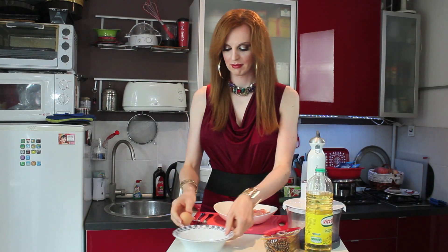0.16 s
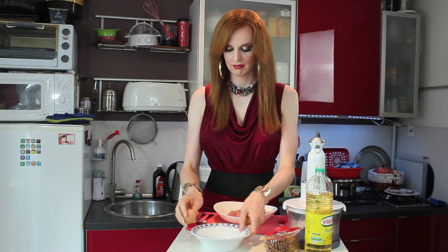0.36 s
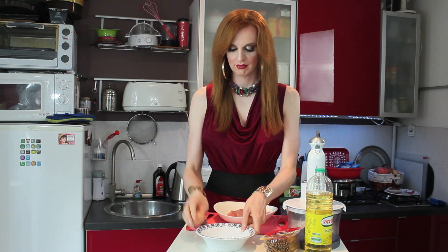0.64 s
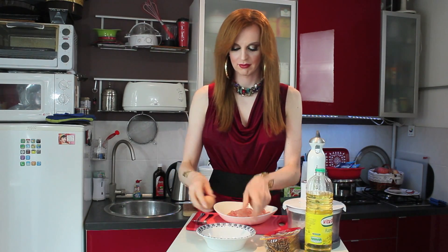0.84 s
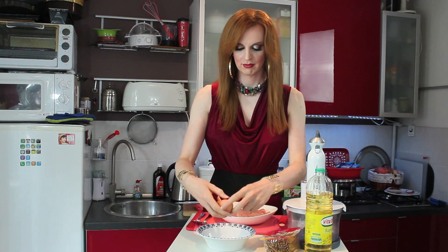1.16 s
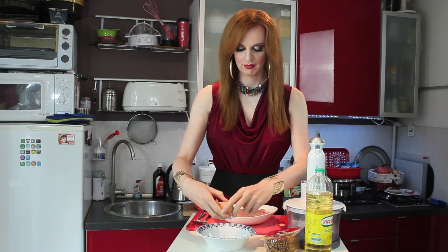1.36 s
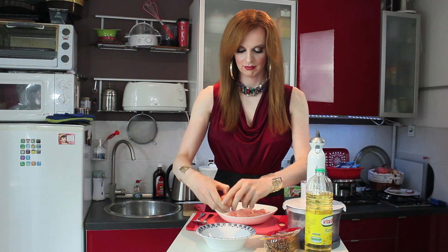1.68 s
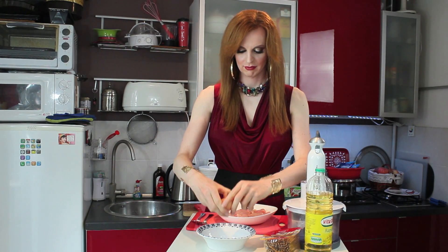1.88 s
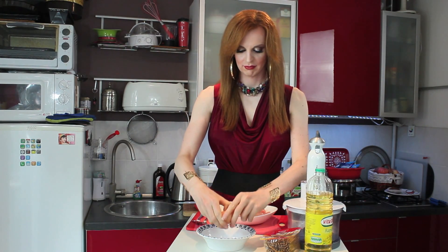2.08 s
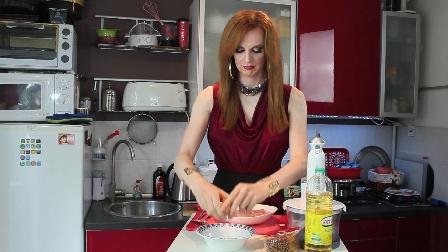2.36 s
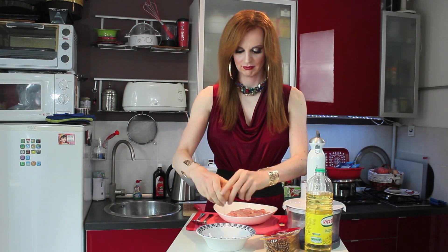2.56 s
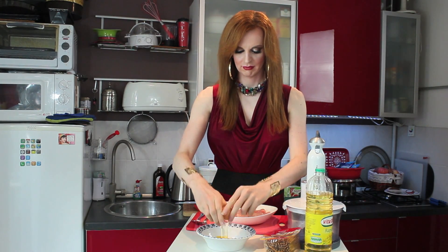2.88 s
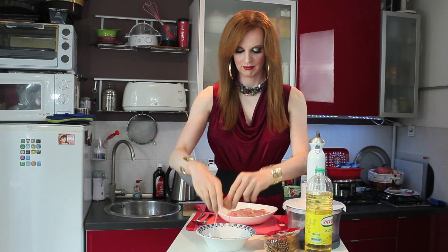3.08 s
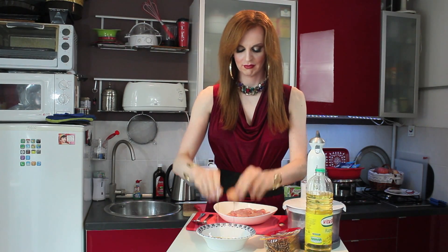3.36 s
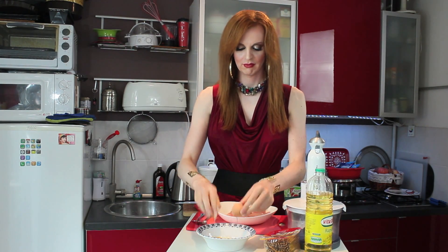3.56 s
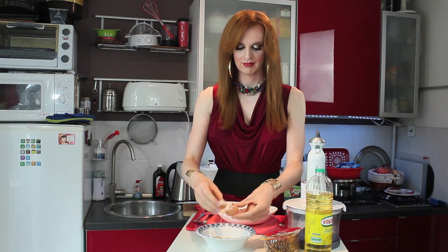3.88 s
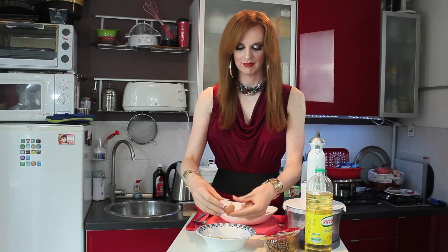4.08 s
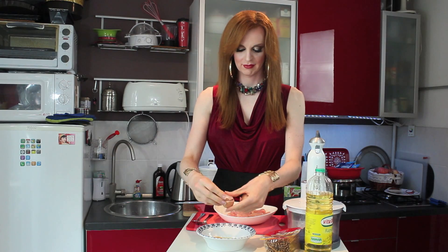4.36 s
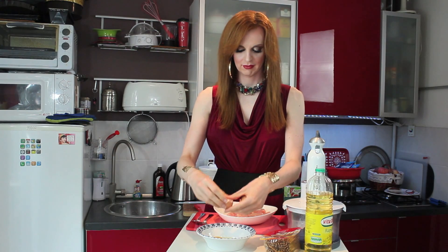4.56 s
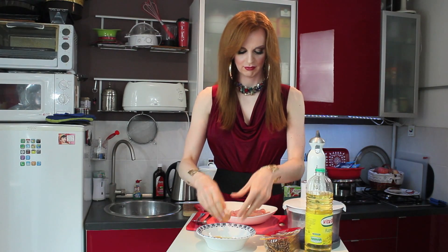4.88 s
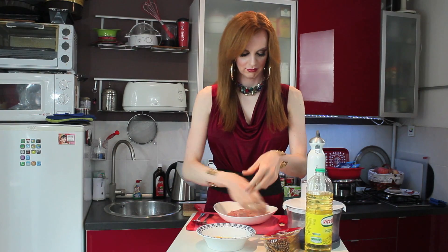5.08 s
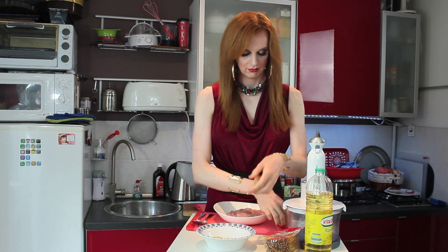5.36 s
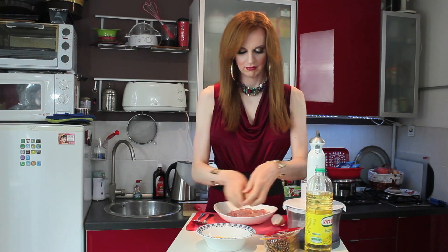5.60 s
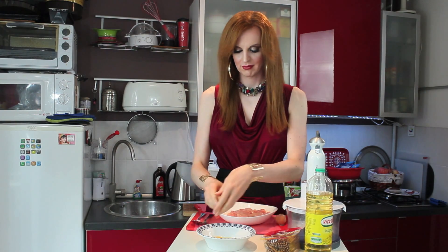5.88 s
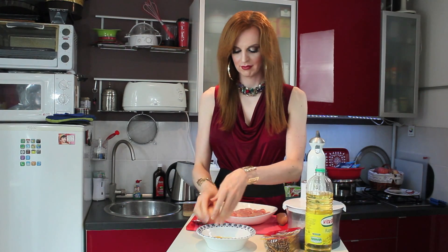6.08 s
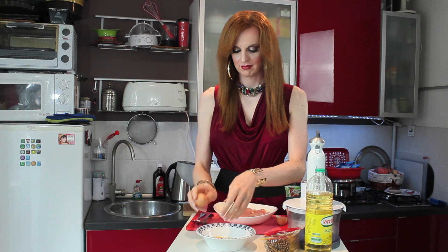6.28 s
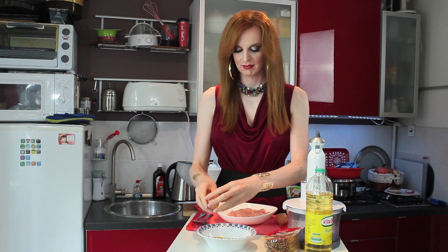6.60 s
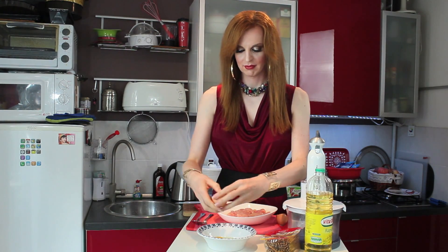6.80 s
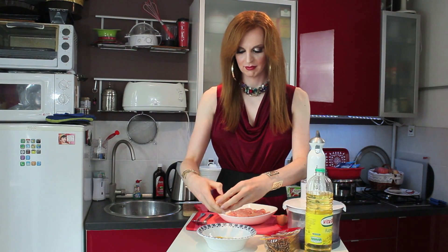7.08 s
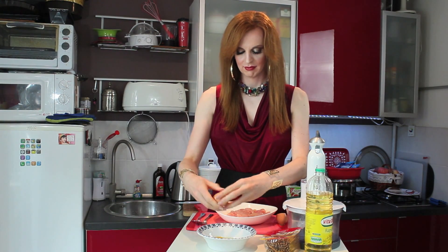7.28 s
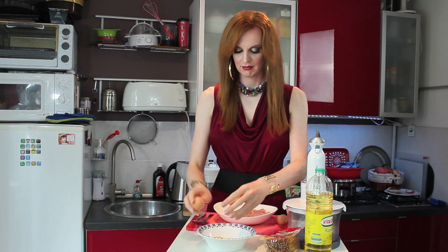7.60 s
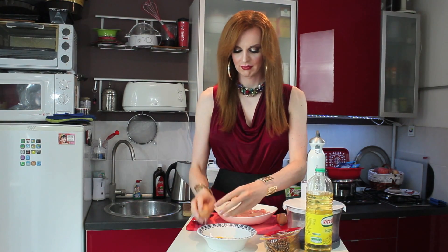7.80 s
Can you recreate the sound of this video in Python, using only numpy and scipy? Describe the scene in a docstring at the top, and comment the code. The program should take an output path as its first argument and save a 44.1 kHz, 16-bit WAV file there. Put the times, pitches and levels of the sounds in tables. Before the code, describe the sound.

In a small kitchen, a ceramic bowl scrapes briefly over a table. An egg is knocked on its rim with a sharp clink, a crunch and a woody thump. The shell is pulled apart in small hollow snaps, and things are set down softly. A second egg then gets three knocks, the bowl ringing and the table thumping. The nearby microphone picks up a faint steady hiss.

```python
"""Cracking eggs in a kitchen

In a small tiled kitchen, a ceramic bowl scrapes closer over a table. An egg is knocked on its rim:
the bowl rings and the shell crunches. The shell is pulled apart in small hollow snaps, things are
set down, and a second egg gets three knocks. The table thumps under each blow, and the camera's
gain control turns the sound down after the loud ones."""
import sys
import numpy as np
from scipy import signal
from scipy.fft import rfft, irfft, next_fast_len
from scipy.io import wavfile
from scipy.ndimage import uniform_filter1d

SR = 44100
rng = np.random.default_rng(int(sys.argv[2]) if len(sys.argv) > 2 else 0)


def dump(signal):
    """Clip the signal to [-1, 1] and save it as 16-bit WAV at the path in sys.argv[1]."""
    limited = np.clip(np.atleast_2d(signal).T, -1, 1)
    pcm = np.round(limited * 32767).astype(np.int16)
    wavfile.write(sys.argv[1], SR, pcm)


N = 350154
T = np.arange(SR) / SR  # one second of time after a contact

# egg on rim: (time [s], bowl ring [dB], sharpness [0-1], share of ring time the grip leaves [0-1],
# low bowl tone [dB], shell crunch [dB], crunch length [s])
EGG_KNOCKS = [(.6722, -12.5, 1, 0.65, -40.5, -5.5, 0.01), (6.1859, -1.5, 0, 0.85, -30, -18.5, 0.012),
              (6.4618, -7, 0.82, 0.79, -19, -2.5, 0.011), (7.779, -14, 1, 0.53, -33, -15, 0.019)]
# the bowl's tones: (pitch [Hz], level if blunt [dB], level if sharp [dB], ungripped ring time [s])
BOWL_TONES = [(952, -14, -12, .2), (1372, -19, -13, .18), (1830, -26, -13, .18), (2361, -26, -10, .1),
              (2465, 0, 0, .33), (2588, -22, -7, .13), (3715, -33, -7, .25), (4130, -25, -6, .2),
              (4180, -20, -5, .28), (6098, -28, -10, .21), (6415, -40, -15, .16), (7938, -33, -13, .17),
              (8175, -27, -10, .18), (8302, -34, -6, .2), (8705, -40, -14, .16), (9510, -44, -17, .17),
              (10460, -39, -13, .14), (11260, -39, -12, .15), (12860, -48, -17, .14),
              (12980, -46, -16, .14), (13740, -48, -16, .14), (13890, -46, -16, .14)]
# its long-ringing low tone: (pitch [Hz], level [dB], ungripped ring time [s])
BOWL_LOW_TONE = [(1066, 0, 1.19)]
# the shell being pulled open: (time [s], hollow part [dB], crisp part [dB], length [s])
SHELL_SNAPS = [(1.5295, -35, -28.5, 0.0058), (1.575, -46, -31.5, 0.012), (1.652, -39, -34, 0.019),
               (2.34, -54, -59, .01), (2.69, -32, -26, 0.037), (2.721, -19.5, -26.5, 0.022),
               (2.93, -45, -47.5, 0.033), (3.062, -34.5, -39.5, 0.0088), (3.2766, -37, -34, 0.0029),
               (4.072, -32.5, -38, 0.021), (4.306, -31.5, -46, 0.04), (4.334, -30, -41.5, .018),
               (4.431, -37.5, -44, 0.037), (4.469, -26.5, -32.5, .016), (4.486, -24, -29, 0.014),
               (4.941, -30.5, -45.5, .003), (5.686, -47.5, -64, 0.0045), (5.754, -47.5, -70, .004)]
# the shell's hollow rings more clearly once open, and sinks in pitch as the halves part and empty:
# (time [s], pitch [Hz], clearness of the ring [Q])
SHELL_HOLLOW = [(1.65, 1480, .9), (2.72, 2590, 1.66), (3.06, 2370, 3.1), (4.07, 1780, 3.4),
                (4.5, 1585, 2.7), (4.94, 1236, 2.6), (5.75, 1410, 2.6)]
# blows on the table: (time [s], boom [dB], woody knock [dB], lowest pitch stirred [Hz], bounces [count])
TABLE_BLOWS = [(.136, -31, -45, 200, 0), (.153, -32.5, -38.5, 185, 0), (.674, -12, -9.5, 175, 0),
               (2.7, -47.5, -45.5, 300, 1), (5.362, -28, -23.5, 290, 1), (5.478, -36, -62, 292, 0),
               (5.807, -52, -61, 288, 0), (6.003, -28, -35.5, 320, 2), (6.1867, -4, -4.5, 180, 1),
               (6.463, -12.5, -28, 185, 0), (6.514, -9.5, -11.5, 183, 2), (7.782, -18, -26, 190, 0),
               (7.8283, -6.5, -11, 298, 0)]
# the table's tones, plus a low, lingering hum of the room at 227 Hz:
# (pitch [Hz], level [dB], base ring time [s])
TABLE_AND_ROOM_TONES = [(227, -14, .7), (250, 0, .27), (274, -2, .2), (335, -5, .12), (401, 0, .19),
                        (440, -5, .15), (517, -6, .18), (575, -6, .18), (771, -8, .17)]
# the bowl's foot sliding: (time [s], level [dB])
SLIDE_LEVELS = [(0.18, -31.5), (0.248, -42), (0.394, -33.5), (0.598, -50), (0.64, -55)]
# how long the kitchen echoes: (frequency [Hz], time to fade by 60 dB [s])
KITCHEN_ECHO = [(120, 0.15), (240, 0.36), (500, 0.26), (2000, 0.25), (8000, 0.24), (15000, 0.16)]

# Tone colours, all as (frequency [Hz], relative level [dB])
SHELL_CRUNCH = [(100, -17), (500, -14), (1000, 1), (1700, 0), (2100, 1), (2600, 4.5), (3500, -1),
                (5200, -7), (8300, -9.5), (11000, -16), (15500, -8)]  # shell caving in
SHELL_CRACKLE = [(100, -38), (400, -13), (1000, -6), (2000, 4.5), (4000, 2.5), (6000, 0.5), (9000, -4.5),
                 (15500, -4)]  # shell snapping
TABLE_KNOCK = [(100, -54.5), (350, -9), (700, -2.5), (1000, 4), (1350, -1), (1800, -10.5), (2600, -20.5),
               (5000, -33), (15000, -57)]  # struck wood
TABLE_BOOM = [(25, -39), (70, -30.5), (130, -16.5), (185, -48), (235, 9.5), (300, 2.5), (420, 3),
              (600, -7.5), (900, -15.5), (2000, -52.5), (5000, -86)]  # the table top booming
LEG_SHUDDER = [(20, -22), (60, -1.5), (95, -7), (130, 2), (200, -8), (600, -41.5)]  # the table's legs shaking
FOOT_SCRAPE = [(59, -71), (100, -23), (170, -33), (224, -3.5), (249, -1.5), (302, -10.5), (471, -10.5),
               (872, -14), (1030, -8), (1200, -10.5), (1390, -8), (1650, -16.5), (7140, -25),
               (16000, -41.5)]  # the bowl rubbing on the table
BACKGROUND_HISS = [(20, 4), (32, -4.5), (77, -16), (150, -16), (293, -14), (950, -13.5), (2080, -15.5),
                   (4000, -18), (8000, -23.5), (16000, -25)]  # faint steady hiss
WIND_FILTER = [(140, -5.5), (210, -0.5)]  # the camera's bass cut


def egg_knocks():
    """The rim rings as the shell caves in; a blunt blow swells more slowly and has weaker high tones."""
    out = np.zeros(N)
    hz, blunt_db, sharp_db, ring_s = np.transpose(BOWL_TONES)
    for start, ring_db, sharpness, sustain, low_db, crunch_db, length in EGG_KNOCKS:
        tones = np.column_stack([hz, blunt_db + sharpness * (sharp_db - blunt_db), ring_s])
        attack_s = np.interp(sharpness, [0, 1], [.003, .0007])
        clink = ring(tones, sustain, scatter_db=1.5, attack_s=attack_s, echo_db=-4)
        low = ring(BOWL_LOW_TONE, sustain, scatter_db=0, attack_s=.00204, echo_db=-13.5)
        crunch = room(coloured(fracture(length, spike_db=-3), SHELL_CRUNCH), echo_db=-7.5)
        add(out, start, amp(ring_db) * clink + amp(low_db) * low + amp(crunch_db) * levelled(crunch))
    return out


def shell_snap(hollow_hz, q, hollow_db, crisp_db, length):
    """One break, heard both as a crisp crackle and through the hollow of the shell."""
    breaks = fracture(length, spike_db=5)
    cavity = signal.iirpeak(hollow_hz, q, SR)
    hollow = signal.lfilter(*cavity, signal.lfilter(*cavity, breaks))
    hollow = levelled(room(hollow, echo_db=4))
    crisp = levelled(room(coloured(breaks, SHELL_CRACKLE), echo_db=2.5))
    return amp(hollow_db) * hollow + amp(crisp_db) * crisp


def shell_opening():
    """The shell snaps apart; a firm, slow break leaves a shred that gives way a moment later."""
    out = np.zeros(N)
    firm_db, shred_delay_s, shred_length_s = -42, .07, .013
    times, pitches, qs = np.transpose(SHELL_HOLLOW)
    for start, hollow_db, crisp_db, length in SHELL_SNAPS:
        hollow_hz, q = np.interp(start, times, pitches), np.interp(start, times, qs)
        add(out, start, shell_snap(hollow_hz, q, hollow_db, crisp_db, length))
        torn = min(length / shred_length_s, 1) * (hollow_db > firm_db)
        shred = shell_snap(hollow_hz, q, hollow_db=-45, crisp_db=-50.5, length=shred_length_s)
        add(out, start + shred_delay_s, torn * shred)
    return out


def table_thump(lowest_hz, boom_db, knock_db):
    """A woody knock, then the table booms and the room hums above lowest_hz; the legs shudder."""
    knock = levelled(room(coloured(puff(.041), TABLE_KNOCK), echo_db=1.5))
    push = puff(.03) * (1 - np.exp(-T / .012))
    push = levelled(room(coloured(push, TABLE_BOOM), echo_db=-3))
    tones = ring(TABLE_AND_ROOM_TONES, sustain=.97, scatter_db=4.5, attack_s=.006, echo_db=-12)
    bass_cut = signal.butter(4, lowest_hz, "high", fs=SR, output="sos")
    boom = levelled(signal.sosfilt(bass_cut, push + tones))
    legs = amp(-27) * levelled(coloured(puff(.39), LEG_SHUDDER))
    return amp(knock_db) * knock + amp(boom_db) * (boom + legs)


def table_blows():
    """Each blow on the table and its bounces, which lose their knock faster than their boom."""
    out = np.zeros(N)
    gap_s, boom_loss_db, knock_loss_db = .038, 6, 12.5  # per bounce
    for start, boom_db, knock_db, lowest_hz, bounces in TABLE_BLOWS:
        for k in range(bounces + 1):
            thump = table_thump(lowest_hz, boom_db - k * boom_loss_db, knock_db - k * knock_loss_db)
            add(out, start + k * gap_s, thump)
    return out


def bowl_slide():
    """The bowl's foot catches with a gritty tick and scrapes over the table."""
    times, db = np.transpose(SLIDE_LEVELS)
    out = noise(FOOT_SCRAPE) * amp(np.interp(np.arange(N) / SR, times, db, left=-120, right=-120))
    tick = room(coloured(fracture(.013, spike_db=1.5), SHELL_CRUNCH), echo_db=-4.5)
    add(out, .172, amp(-33) * levelled(tick))
    return out


def fracture(length, spike_db):
    """A run of tiny uneven breaks; a quick one opens with a clean snap, a slow one swells."""
    grit = rng.standard_normal(SR)
    spikes = np.repeat(amp(spike_db * rng.standard_normal(SR // 30)), 30)
    swell = (T / length) ** .14 * np.exp(-(T / length) ** 2)
    clean_snap = np.exp(-length / .0067) * levelled(puff(.002))
    return clean_snap + levelled(grit * spikes * swell)


def ring(tones, sustain, scatter_db, attack_s, echo_db):
    """Tones that fade after a blow; scatter_db varies their strength each time."""
    hz, db, ring_s = np.transpose(tones)[:, :, None]
    strength = amp(db + scatter_db * rng.standard_normal(hz.shape))
    fade = amp(-60 * T / (ring_s * sustain))
    rise = 1 - np.exp(-T / attack_s)
    waves = rise * fade * np.sin(2 * np.pi * (hz * T + rng.random(hz.shape)))
    return levelled(np.sum(strength * levelled(room(waves, echo_db)), axis=0))


def room(x, echo_db):
    """The sound plus its echo off tiles and cupboards, new for each contact."""
    hz, t, bands = signal.stft(rng.standard_normal(SR // 2), SR, nperseg=256)
    fade = amp(-60 * t / along(KITCHEN_ECHO, hz)[:, None])
    tail = signal.istft(bands * fade, SR, nperseg=256)[1][:SR // 2]
    tail *= 1 - np.exp(-T[:len(tail)] / .002)
    response = rfft(tail / np.linalg.norm(tail), 2 * SR)
    echo = irfft(rfft(x, 2 * SR) * response, 2 * SR)[..., :SR]
    return x + amp(echo_db) * echo


def noise(colour):
    """Steady noise with the given tone colour, at an average (rms) level of 1."""
    size = next_fast_len(N)
    gains = amp(along(colour, np.fft.rfftfreq(size, 1 / SR)))
    x = irfft(rfft(rng.standard_normal(size)) * gains, size)[:N]
    return x / x.std()


def puff(fade_s):
    """Noise that fades by 60 dB in fade_s seconds."""
    return rng.standard_normal(SR) * amp(-60 * T / fade_s)


def coloured(x, colour):
    """Give a sound a tone colour without smearing it to before its start."""
    gains = amp(along(colour, np.fft.rfftfreq(len(x), 1 / SR)))
    cepstrum = irfft(np.log(gains), len(x))
    cepstrum[1:len(x) // 2] *= 2  # move the filter's early half to after the start
    cepstrum[len(x) // 2 + 1:] = 0
    return irfft(rfft(x) * np.exp(rfft(cepstrum)), len(x))


def amp(db):
    """Turn decibels into a multiplier."""
    return 10 ** (np.asarray(db) / 20)


def along(points, hz):
    """Read between (frequency, value) points, with octaves evenly spaced."""
    frequencies, values = np.transpose(points)
    return np.interp(np.log(hz + 1), np.log(frequencies), values)


def levelled(x):
    """Give each short sound the same energy: that of 20 ms at level 1."""
    return x / np.sqrt(np.sum(x ** 2, axis=-1, keepdims=True) / (SR / 50) + 1e-20)


def add(track, start, x):
    """Mix x into the track at start seconds."""
    part = track[round(start * SR):][:len(x)]
    part += x[:len(part)]


def gain_control(x, limit_db, attack_s, recovery_db_per_s):
    """The camera turns loud sounds down quickly, then slowly turns back up."""
    power = np.abs(uniform_filter1d(x[0] ** 2, size=220))
    excess_db = np.maximum(10 * np.log10(power + 1e-12) - limit_db, 0)
    climb_db = recovery_db_per_s * np.arange(N) / SR
    cut_db = np.maximum.accumulate(excess_db + climb_db) - climb_db
    smoothing = np.exp(-1 / (attack_s * SR))
    return x * amp(-signal.lfilter([1 - smoothing], [1, -smoothing], cut_db))


def scene():
    """Eggs, bowl and table over a faint steady hiss, in one channel."""
    handling = egg_knocks() + table_blows() + shell_opening() + bowl_slide()
    return (handling + amp(-55) * noise(BACKGROUND_HISS))[None]


def record(dry):
    """The camera tames loud blows, flattens peaks that slip by, and trims the bass and highest treble."""
    x = np.clip(gain_control(dry, limit_db=-8.5, attack_s=.0018, recovery_db_per_s=25), -1, 1)
    size = next_fast_len(N + SR // 2)
    hz = np.fft.rfftfreq(size, 1 / SR)
    treble_cut = np.interp(hz, [15800, 16300], [1, 0])
    return irfft(rfft(x, size) * treble_cut * amp(along(WIND_FILTER, hz)), size)[:, :N]


dry = scene()
out = record(dry)
dump(out)
```